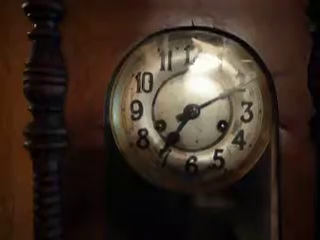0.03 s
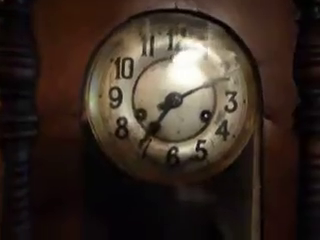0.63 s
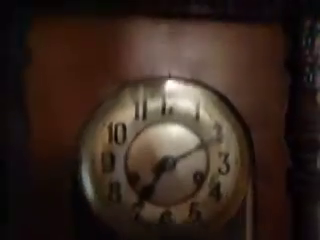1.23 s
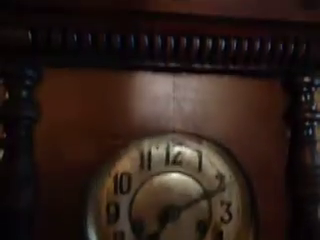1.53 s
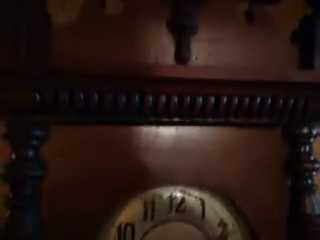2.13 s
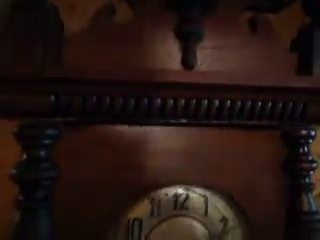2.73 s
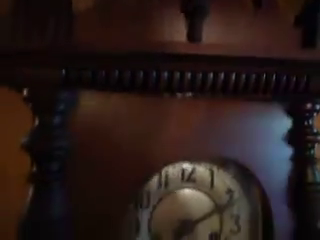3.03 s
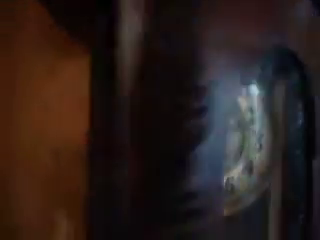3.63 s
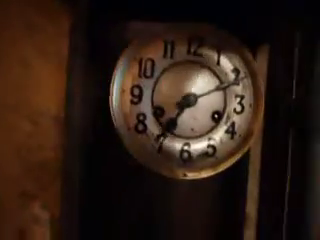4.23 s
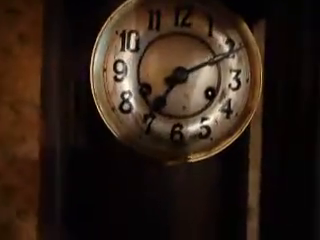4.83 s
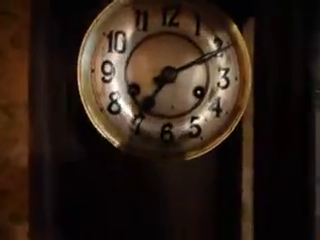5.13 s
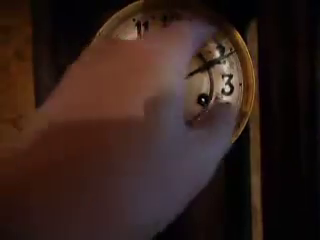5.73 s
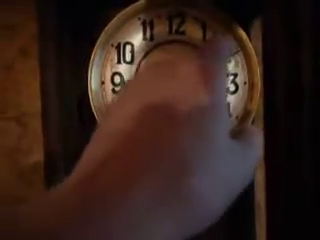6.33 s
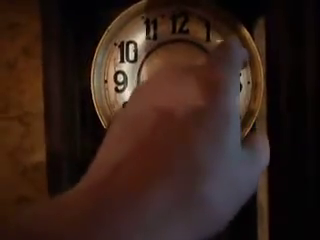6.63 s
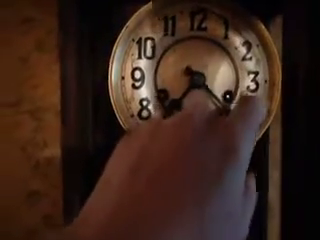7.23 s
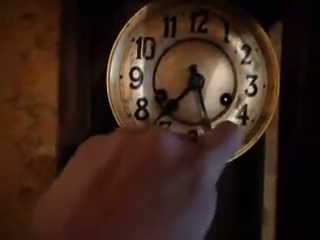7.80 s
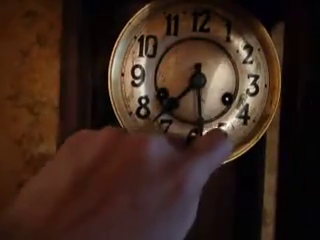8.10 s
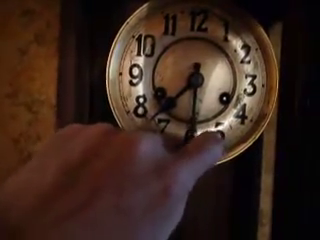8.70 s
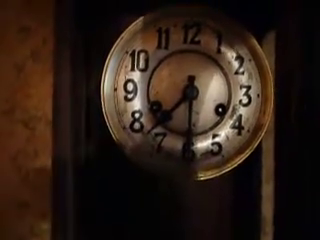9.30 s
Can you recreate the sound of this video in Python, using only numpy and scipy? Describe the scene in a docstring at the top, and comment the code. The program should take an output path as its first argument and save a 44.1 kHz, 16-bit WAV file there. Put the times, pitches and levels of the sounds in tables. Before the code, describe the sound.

An old pendulum wall clock ticks close up while its door catch snaps, fingers knock on the case and a lever drops.

```python
"""An old pendulum wall clock ticks close up in a quiet room, each escape-wheel tooth ringing the brass
movement. The catch of its glazed door scrapes and snaps, the door drags open and the beat gets louder.
Fingers knock and brush on the case and push the minute hand to the half hour, where the strike lever
drops, the coiled gong shivers and the striking train starts to whirr."""
import sys
import numpy as np
from scipy import signal
from scipy.fft import irfft
from scipy.io import wavfile
from scipy.ndimage import uniform_filter1d

SR = 44100
rng = np.random.default_rng(int(sys.argv[2]) if len(sys.argv) > 2 else 0)


def digitize_waveform(pressure):
    """Quantize a signal to 16-bit integers and store it at the path in sys.argv[1].

    Rows of a 2-D input are taken as channels; values are limited to [-1, 1].
    """
    field = np.atleast_2d(pressure).T
    bounded = np.clip(field, -1, 1)
    quanta = np.round(bounded * 32767).astype(np.int16)
    wavfile.write(sys.argv[1], SR, quanta)


N = 412776
T = np.arange(N) / SR
HIT = T[:SR // 2]  # time axis of a one-shot

# Spectra (f/Hz, level/dB). Levels in all tables are relative: each layer has its own trim.
ROOM_COLOUR = [(29, -29.5), (50, -1), (55, -5.5), (109, -2), (417, -5.5), (717, -10.5), (971, -11.5),
               (1080, -13.5), (1940, -17.5), (3640, -23), (4330, -23), (6120, -26.5), (7760, -31.5),
               (8840, -54.5), (11500, -83), (19400, -120)]  # still air
CASE_COLOUR = [(59, -37), (100, -2.5), (302, -5.5), (703, -6), (832, -6.5), (967, -3.5), (1280, -10.5),
               (2210, -7), (2520, -16), (4330, -19.5), (5960, -17.5), (7470, -18.5), (8840, -47.5),
               (11500, -95), (19400, -120)]  # knock on the case
TICK_COLOUR = [(150, -31), (500, 9), (1000, 1), (1900, -10), (2600, -8.5), (3700, -4.5), (4600, -16.5),
               (6200, -4.5), (7100, -8.5), (8500, -31)]  # tooth on the entry pallet
TOCK_COLOUR = [(150, -32), (500, -21), (1000, 1.5), (1900, 4), (2600, -10.5), (3700, -4), (4600, -16),
               (6100, -18.5), (7000, -7.5), (8500, -60)]  # tooth on the exit pallet
SNAP_COLOUR = [(88, -51), (150, -23), (417, -11), (539, -5), (745, -17), (930, 6), (1380, -12),
               (2070, -3.5), (2630, -8), (2920, -7.5), (3640, -2), (4320, -13.5), (4780, -8), (6960, -7),
               (8840, -35), (11500, -69.5), (19400, -120)]  # door catch
SKIN_COLOUR = [(150, -3), (450, 1), (900, -1), (2000, -7.5), (3200, -15), (6000, -45)]  # skin on wood
SLEEVE_COLOUR = [(1000, -7.5), (2800, 1.5), (4500, -0.5), (6500, -1), (7500, -6.5), (8800, -27.5)]  # brushing cloth
STOP_COLOUR = [(88, -57), (150, -27), (297, -22), (417, -8), (577, -8), (946, -1), (1100, -22),
               (1430, -2.5), (2220, -29), (2420, -9), (2770, -13.5), (3970, -9.5), (5120, -24), (6730, -23),
               (8840, -57), (11500, -82), (19400, -120)]  # door on its stop
LEVER_COLOUR = [(88, -73), (150, -34), (607, 1.5), (684, 1), (996, -2.5), (1200, -1), (1500, -19),
                (1690, 9), (1870, -12), (5970, -11.5), (6960, -22), (7580, -17), (8840, -43), (11500, -72),
                (19400, -120)]  # lever landing

# Resonances (f/Hz, level/dB, t60/s)
CASE_MODES = [(389, -8.5, 0.19), (531.7, 3.5, 0.26), (706, -2, 0.18), (920, -4.5, 0.13), (1000, -2.5, 0.12),
              (1195, -3, 0.19), (1690, -4.5, 0.1), (2370, -1, 0.15), (2720, -15.5, 0.11),
              (3920, -13, 0.051)]  # wooden case
MOVEMENT_MODES = [(1376, -14, .106), (1606, -2.5, .11), (1703, -14, .095), (1820, -4.5, .093),
                  (1982, .5, .11), (2170, -.5, .11), (861, -20, .1), (1190, -15, .09), (2450, -18, .07),
                  (3290, -20, .06), (3700, -16, .06), (3865, -18, .09), (6720, -18, .08), (7080, -18, .06)]  # brass movement on its wooden seat
CATCH_MODES = [(532, -3, 0.097), (940, -11, 0.25), (995, -15, 0.094), (1254, -4.5, 0.093),
               (1690, -9.5, 0.2), (2160, -14, 0.031), (2923, 2, 0.084), (3410, -9, 0.097),
               (3640, -9, 0.089), (4730, -4, 0.12), (5400, 0.5, 0.052), (7050, -13, 0.065)]  # catch and glazed door
DOOR_MODES = [(307, -7, 0.12), (338, -2.5, 0.11), (405, -1.5, 0.072), (534, -3, 0.042), (840, -0.5, 0.032),
              (1090, -5, 0.04)]  # wood of the door
FRAME_MODES = [(451, -1, 0.14), (565, -12, 0.07), (654, -5, .08), (724, -1, 0.17), (820, 0, 0.097),
               (906, 6, 0.071), (1250, -4, 0.18), (1362, 1, 0.12), (1669, -3, 0.11), (2450, -9, 0.12),
               (3570, -3, .04), (3640, 0, 0.036), (4680, -9, .08), (6780, -1, 0.028)]  # door frame
LEVER_MODES = [(727, -4.5, 0.2), (867, -6, 0.2), (1195, -1.5, 0.15), (1707, -1.5, 0.18), (2400, -6.5, 0.12),
               (2632, -18, 0.26), (3740, -18, .16), (4220, -3.5, 0.074), (4880, -14, 0.18),
               (5910, 4.5, 0.048), (6110, -21, 0.21), (7300, -12, .12), (7600, -6, 0.11),
               (8300, -20.5, 0.14)]  # lever and its arbor
GONG_MODES = [(520, -7, 2.4), (718, -7.5, 7.1), (1200, -11, 4), (1380, -10, 2.6), (1650, -11, 3),
              (1850, -15, 0.94), (2632, -3.5, 0.83), (3085, -14, 1.8), (3960, -17, 1.9), (4900, -9, 1.2),
              (5850, 0, 0.53), (6100, -4, 0.77), (7504, -15, 0.83)]  # coiled gong

# fingers on the case (t/s, level/dB, hardness/dB: nail above 0, fingertip below)
KNOCKS = [(0.398, -49, 2.5), (1.325, -47, 3), (1.761, -44, -4), (1.809, -43.5, 1.5), (3.662, -44.5, 1),
          (4.598, -41, -10), (4.811, -48.5, 9), (5.037, -45, -4), (5.553, -39, 3), (6.448, -43, -4),
          (7.379, -41.5, 0.5), (7.702, -45, -3), (7.818, -47.5, 1), (8.284, -34, 1), (8.304, -38, -8),
          (9.233, -41, -1)]
# the worn escape wheel lets each beat go late or early (delay/ms)
TOOTH_LATE_MS = [-4, 1, 2, 6, -2, 7, 1, 3, 3, -2, 0, -1, 0, -9, -3, -2]
# a tooth lands on the pallet and rebounds (delay/ms, level/dB)
REBOUNDS = [(-0.43, -2.5), (3.99, -1.8), (8.28, -5.1), (14.61, -12)]
# snaps of the catch (t/s, level/dB, ring against that level/dB, scrape/dB)
SNAPS = [(0.878, -21, -14, -47.5), (3.279, -21.5, -18, -55.5)]
# strokes of the hand over the case (t/s, length/s, skin/dB, sleeve/dB)
STROKES = [(0.904, .17, -53.5, -58), (1.225, 0.41, -67, -66.5), (1.925, .125, -55.5, -54.5),
           (2.6, 0.22, -56, -58.5), (3.101, .14, -54, -65), (4.067, .14, -63, -61),
           (4.225, 0.46, -57.5, -69), (5.368, 0.23, -53.5, -64.5), (5.96, 0.063, -56, -63),
           (6.538, 0.15, -54, -61), (7.27, 0.24, -51.5, -68), (7.69, .07, -54, -61),
           (8.193, .11, -60, -63.5)]
# flicks of the minute hand (t/s, level/dB, f/Hz)
FLICKS = [(5.52, -41, 2250), (6.450, -46, 2234), (6.902, -33.5, 736), (7.031, -35, 741)]

# One-shot cues (t/s, level/dB)
BUMPS = [(4.365, -40.5), (4.55, -33.5), (4.687, -34.5), (5.571, -34), (7.567, -34.5), (7.7, -34.5),
         (8.151, -41), (9.0, -40)]  # dull handling bumps
LEVER_HITS = [(8.5995, -23.5), (8.6024, -34), (8.6073, -24.5), (8.627, -27), (8.649, -37)]  # the lever drops and bounces

# Fader curves (t/s, level/dB)
BEAT_FADER = [(.5, -35.5), (1.7, -38), (2.3, -34), (3.4, -35), (5.1, -31), (6.6, -30.5), (7.4, -26),
              (8.6, -26), (9.2, -30.5)]  # the beat, as the microphone comes nearer
DRAG_FADER = [(2.57, -70), (2.6, -43), (2.65, -44.5), (2.69, -50), (2.75, -52.5), (2.8, -52.5), (2.88, -63)]  # the dragging door
TRAIN_FADER = [(8.65, -63), (8.78, -62), (8.86, -52.5), (9.0, -55.5), (9.12, -51), (9.36, -49.5)]  # the striking train


def undb(db):
    """Decibels to gain."""
    return 10 ** (np.asarray(db) / 20)


def unit(x):
    """Scale to rms 1."""
    return x / np.sqrt(np.mean(x ** 2))


def fader(points):
    """Gain ride through (t/s, level/dB) points; silent outside them."""
    return undb(np.interp(T, *np.transpose(points), left=-200, right=-200))


def noise(colour, size=len(HIT)):
    """Noise of rms 1, shaped by (f/Hz, level/dB) points."""
    hz, db = np.transpose(colour)
    log_hz = np.log(np.fft.rfftfreq(size, 1 / SR) + 1)
    phases = np.exp(2j * np.pi * rng.random(len(log_hz)))
    return unit(irfft(phases * undb(np.interp(log_hz, np.log(hz), db)), size))


def fade(t60, t=HIT):
    """Exponential decay, 60 dB down after t60."""
    return np.exp(-np.log(1000) * t / t60)


def ring(modes, t=HIT, rise_s=.00059):
    """Ring-out of (f/Hz, level/dB, t60/s) modes, building as the blow spreads through the body."""
    partials = sum(undb(db) * fade(t60, t) * np.sin(2 * np.pi * hz * t) for hz, db, t60 in modes)
    return (1 - np.exp(-t / rise_s)) * partials


def resonate(drive, modes):
    """Play a signal through a body's modes; rms 1."""
    return unit(signal.fftconvolve(drive, ring(modes))[:N])


def burst(colour, t60, tail_db, tail_t60):
    """A blow on dense modes: a fast transient, then the tail of case and room."""
    return noise(colour) * np.hypot(fade(t60), undb(tail_db) * fade(tail_t60))


def band(x, hz, kind):
    """Gentle low or high pass."""
    return signal.sosfilt(signal.butter(2, hz, kind, fs=SR, output="sos"), x)


def add(out, s, x):
    """Mix x into out from time s."""
    i = max(int(s * SR), 0)
    out[i:i + len(x)] += x[:max(len(out) - i, 0)]


def walk(rate):
    """Random drift of rms 1, with rate turns a second."""
    step = int(SR / rate)
    held = np.repeat(rng.standard_normal(N // step + 1), step)
    return unit(uniform_filter1d(held, step)[:N])


def slips(per_s, spread_db):
    """Random tiny impacts of uneven size."""
    return (rng.random(N) < per_s / SR) * undb(spread_db * rng.standard_normal(N))


def room_tone():
    """A low, barely drifting bed of still air."""
    return noise(ROOM_COLOUR, N) * undb(-53.5 + .5 * walk(6))


def stray_taps(per_s=1.2):
    """Faint finger taps at random moments, as extra rows for KNOCKS."""
    gap, level, hardness = rng.random((40, 3)).T
    rows = zip(np.cumsum(.5 + gap) / per_s, -55.5 + level, 3 * hardness)
    return [row for row in rows if row[0] < T[-1]]


def knocks():
    """Fingers ring the wooden case: nails bright, fingertips dull."""
    out = np.zeros(N)
    for s, db, hardness_db in KNOCKS + stray_taps():
        blow = burst(CASE_COLOUR, t60=.078, tail_db=-3.5, tail_t60=.19)
        bass = undb(-6.5 - hardness_db) * band(blow, 470, "low")
        mids = band(band(blow, 490, "high"), 2800, "low")
        treble = undb(-1 + hardness_db) * band(blow, 2800, "high")
        add(out, s, undb(db - 5.5) * (mids - bass - treble))  # flipped polarity fills the crossovers
        add(out, s, undb(db - 12) * ring(CASE_MODES, rise_s=.002))
    return out


def pendulum(first_tick_s=.485, swing_s=1.155, tock_after_s=.61):
    """Time and level of each beat; the tock limps late, as the clock hangs out of beat."""
    k = np.arange(len(TOOTH_LATE_MS))
    times = first_tick_s + k // 2 * swing_s + k % 2 * tock_after_s + np.array(TOOTH_LATE_MS) / 1000
    return zip(times, np.interp(times, *np.transpose(BEAT_FADER)))


def escapement(door_open_s=3.7):
    """A tooth rebounds on the pallet and rings the movement; the shut door muffles the beat."""
    out = np.zeros(N)
    swell = (HIT / .0012) ** 3 * np.exp(3 * (1 - HIT / .0012))  # peaks at 1.2 ms
    clack = undb(-2) * swell * np.sin(2 * np.pi * 1620 * HIT)
    shut_colour = [(700, -19), (1400, -3), (2000, -4.5), (2800, -16), (6000, -36)]
    for k, (s, db) in enumerate(pendulum()):
        pallet = TOCK_COLOUR if k % 2 else TICK_COLOUR
        beat = undb(-13) * ring(MOVEMENT_MODES, rise_s=.0016)
        beat += undb(-18) * burst(pallet, t60=.069, tail_db=-3, tail_t60=.21)
        door_db = 0
        if s < door_open_s:  # the shut case holds the sound a little longer
            beat = undb(-4) * beat + undb(-19) * noise(shut_colour) * fade(.27)
            door_db = -7
        beat = np.pad(beat, (SR // 1000, 0))  # 1 ms of pre-roll for the first contact
        for ms, rebound_db in REBOUNDS:
            late, hard = rng.standard_normal(2)
            contact = clack + undb(-10) * band(noise(pallet), 3100, "high") * fade(.029)
            add(beat, (ms + 1 + .03 * late) / 1000, undb(door_db + rebound_db + 1.2 * hard) * contact)
        add(out, s - .001, undb(db + 3) * beat)
    return out


def catch_scrape(slide_s=.14, squeak_hz=2870):
    """The catch sticks and slips, pressed ever harder up to each snap."""
    grains = noise(SNAP_COLOUR, N) * undb(3.2 * walk(150))
    squeak = unit(signal.lfilter(*signal.iirpeak(squeak_hz, Q=7, fs=SR), grains))
    pressure = sum(undb(db) * np.clip(1 - (s - T) / slide_s, 0, 1) * (T < s) for s, _, _, db in SNAPS)
    return pressure * (undb(-8) * squeak + undb(-5.5) * grains)


def catch_snaps():
    """The catch cracks free and strikes home a moment later, ringing the glazed door."""
    out = np.zeros(N)
    for s, db, ring_db, _ in SNAPS:
        add(out, s, undb(db - 10.5) * burst(SNAP_COLOUR, t60=.019, tail_db=-2, tail_t60=.2))
        add(out, s + .003, undb(db + ring_db) * ring(CATCH_MODES))
        add(out, s + .004, undb(db - 3) * noise(SNAP_COLOUR) * fade(.022))
    return out


def hand_rub():
    """Grainy skin friction rings the case under a hiss of sleeve; each stroke swells and fades."""
    skin = noise(SKIN_COLOUR, N) * undb(3.4 * walk(70))
    rub = undb(-2.5) * skin + undb(-11) * resonate(skin, CASE_MODES)
    sleeve = noise(SLEEVE_COLOUR, N) * undb(2 * walk(90))
    out = rub * undb(-64.5 + 5.5 * walk(7.1)) * (T > 4) * (T < 8.4)  # the resting hand fidgets
    for start, length, skin_db, sleeve_db in STROKES:
        pressure = undb(2.5) * np.sin(np.pi * np.clip((T - start) / length, 0, 1))
        out += pressure * (undb(skin_db) * rub + undb(sleeve_db) * sleeve)
    return out


def door_drag():
    """The wooden door sticks and slips in its frame."""
    return undb(-.5) * fader(DRAG_FADER) * resonate(slips(per_s=500, spread_db=1), DOOR_MODES)


def bumps():
    """The case booms under soft bumps of the hand."""
    out = np.zeros(N)
    colour = [(40, -27), (160, 2), (400, -4), (800, -9), (3000, -71)]
    attack = 1 - np.exp(-HIT / .0022)
    for s, db in BUMPS:
        add(out, s, undb(db - 7) * attack * burst(colour, t60=.08, tail_db=-2.5, tail_t60=.24))
    return out


def door_stop(s=5.2745):
    """The open door clunks against its stop and rings the frame."""
    out = np.zeros(N)
    add(out, s, undb(-30) * burst(STOP_COLOUR, t60=.035, tail_db=-7, tail_t60=.13))
    add(out, s, undb(-36.5) * ring(FRAME_MODES, rise_s=.0005))
    return out


def minute_hand():
    """The minute hand flicks under the finger with a short, soft-edged ping."""
    out = np.zeros(N)
    for s, db, hz in FLICKS:
        modes = [(hz, 0, .08), (.9 * hz, -4, .06), (1.4 * hz, -7, .05)]
        add(out, s, undb(db) * ring(modes, rise_s=.0037))
    return out


def strike_lever():
    """The lever falls, bounces and rings, shaking the gong through the frame."""
    out = np.zeros(N)
    for s, db in LEVER_HITS:
        add(out, s, undb(db - 4.5) * burst(LEVER_COLOUR, t60=.056, tail_db=-8, tail_t60=.19))
    drop_s = LEVER_HITS[1][0]
    add(out, drop_s, undb(-30) * ring(LEVER_MODES))
    add(out, drop_s, undb(-55) * ring(GONG_MODES, T))
    return out


def striking_train():
    """The freed wheels rattle movement and arbor while the fly whirrs."""
    teeth = slips(per_s=700, spread_db=2)
    wheels = resonate(teeth, MOVEMENT_MODES)
    arbor = resonate(teeth, [(1167, -1, .24), (1130, 2, .073), (3400, -6, .11), (3810, -5.5, .092)])
    fly_colour = [(150, 2), (600, 3), (2200, 4.5), (3800, -5), (5000, -10), (7000, -8), (8800, -31)]
    fly = noise(fly_colour, N) * undb(1.4 * walk(30))
    return fader(TRAIN_FADER) * (undb(-8.5) * wheels + undb(-6.5) * arbor + undb(-5) * fly)


def scene():
    """Mono mix of clock, door and hand over the room tone."""
    mix = room_tone() + knocks() + escapement() + catch_scrape() + catch_snaps() + hand_rub()
    mix += door_drag() + bumps() + door_stop() + minute_hand() + strike_lever() + striking_train()
    return mix[None]


def record(dry, start_s=.067, top_hz=8750):
    """Lo-fi chain: a sharp notch, a small DC offset, a moment of silence first and a steep high cut."""
    notched = signal.lfilter(*signal.iirnotch(4390, Q=28, fs=SR), dry)
    gated = (notched + .0122) * np.clip((T - start_s) / .002, 0, 1)
    return signal.sosfilt(signal.ellip(10, .2, 70, top_hz, fs=SR, output="sos"), gated)


dry = scene()
out = record(dry)
digitize_waveform(out)
```